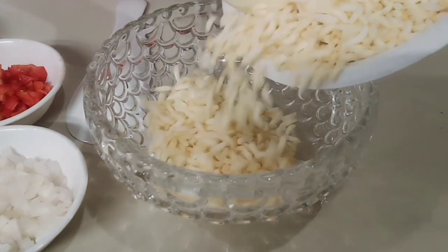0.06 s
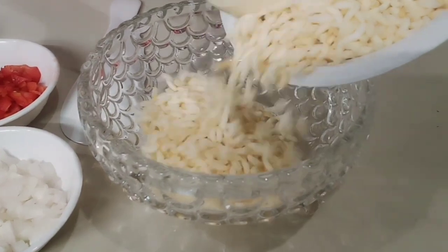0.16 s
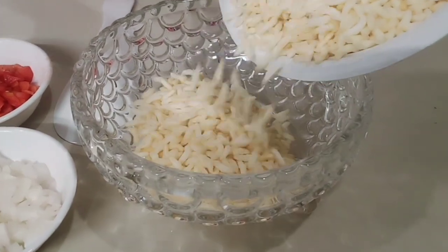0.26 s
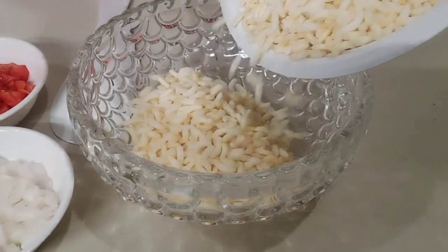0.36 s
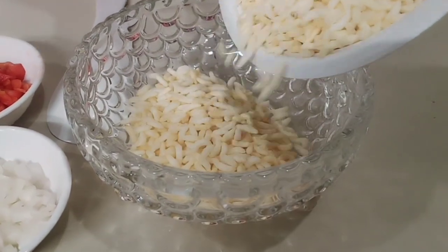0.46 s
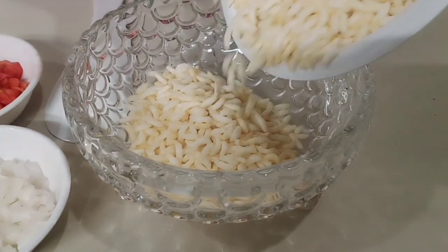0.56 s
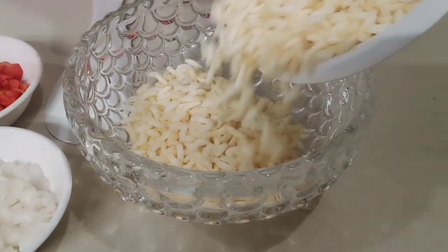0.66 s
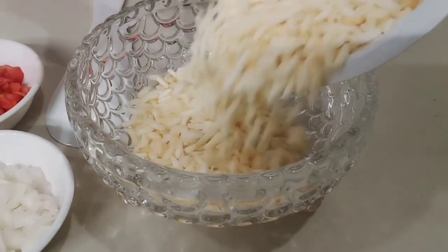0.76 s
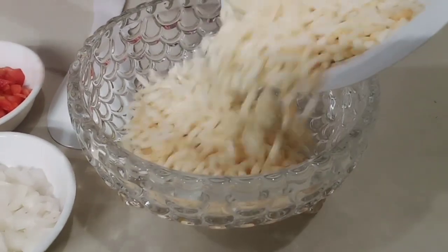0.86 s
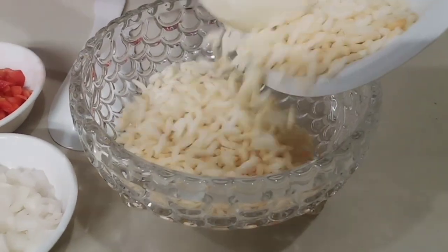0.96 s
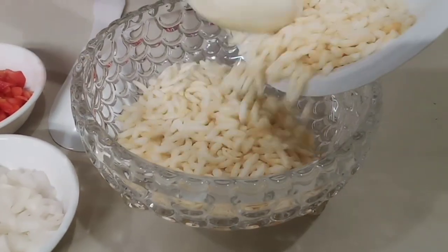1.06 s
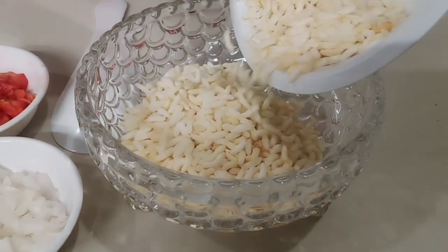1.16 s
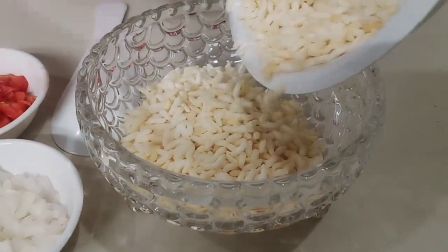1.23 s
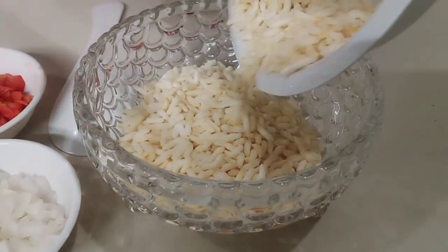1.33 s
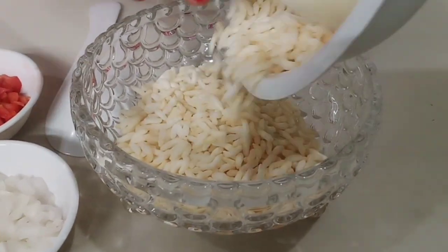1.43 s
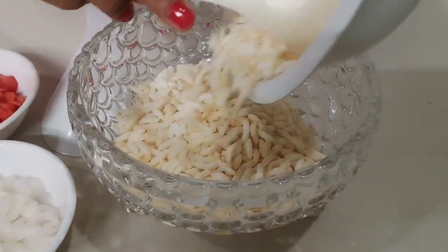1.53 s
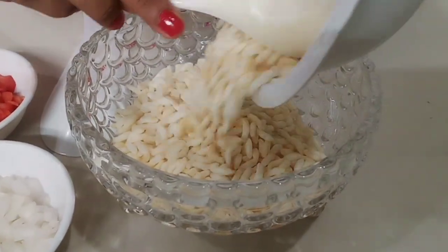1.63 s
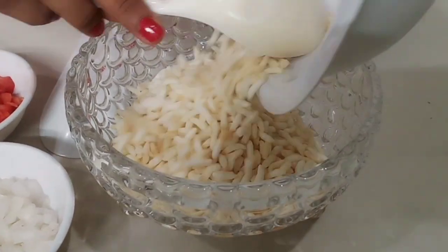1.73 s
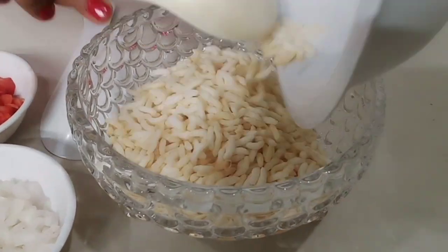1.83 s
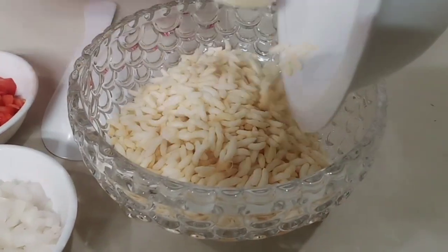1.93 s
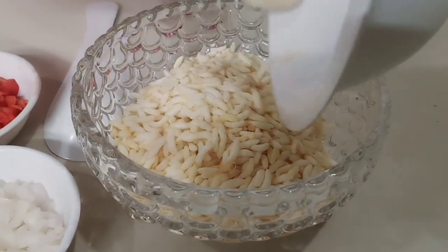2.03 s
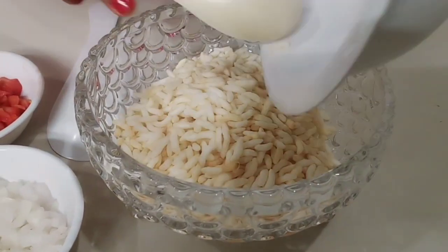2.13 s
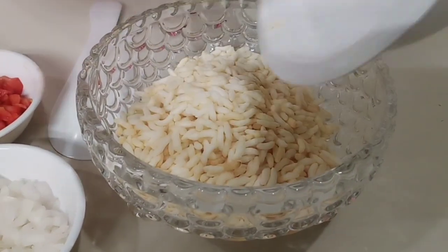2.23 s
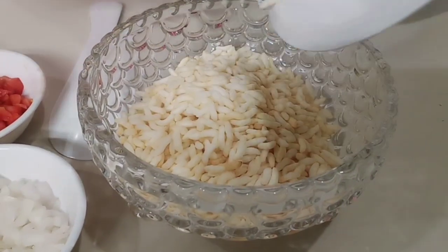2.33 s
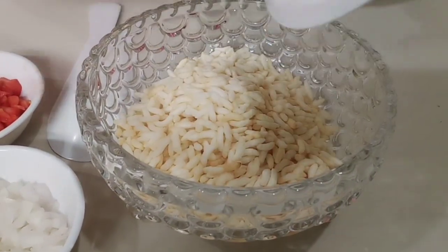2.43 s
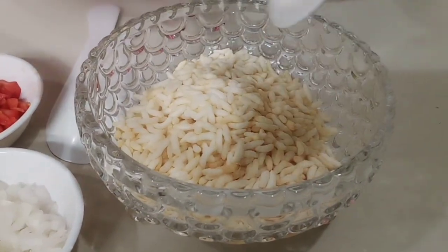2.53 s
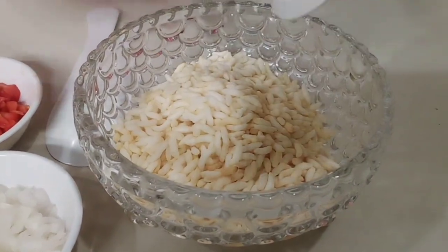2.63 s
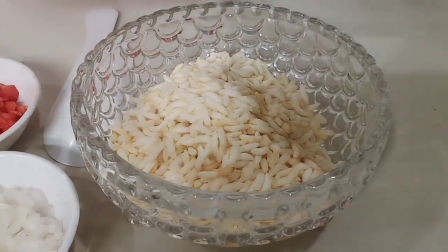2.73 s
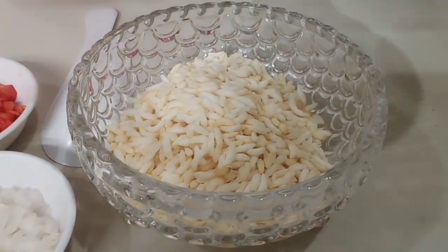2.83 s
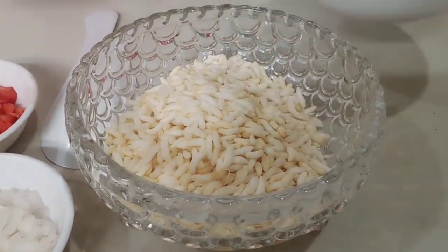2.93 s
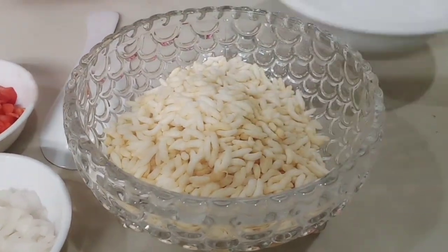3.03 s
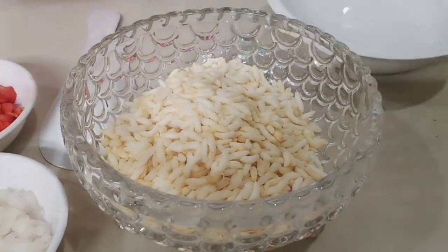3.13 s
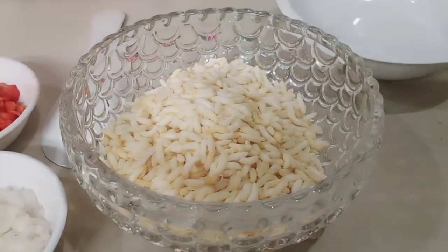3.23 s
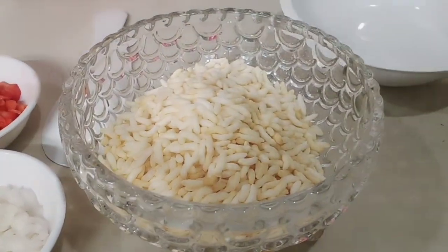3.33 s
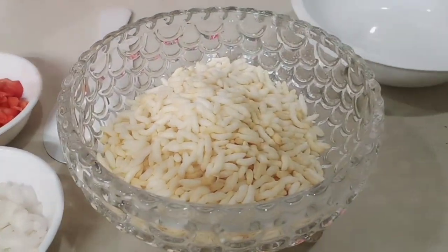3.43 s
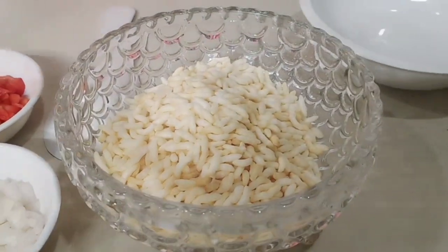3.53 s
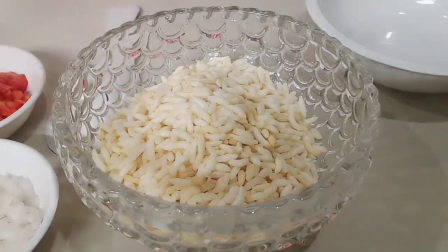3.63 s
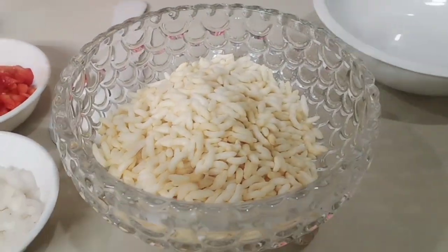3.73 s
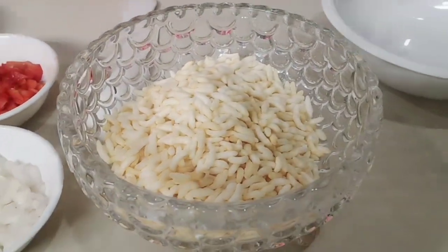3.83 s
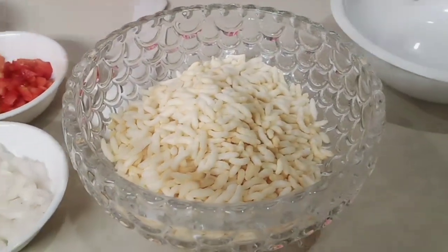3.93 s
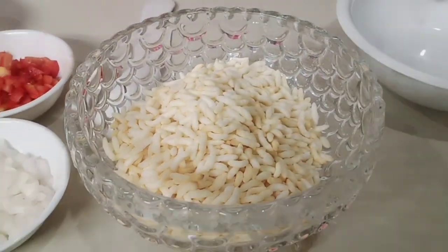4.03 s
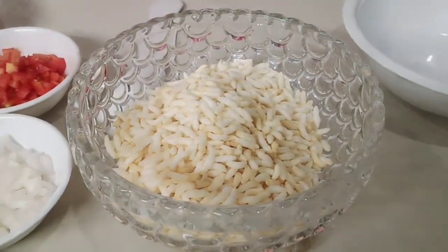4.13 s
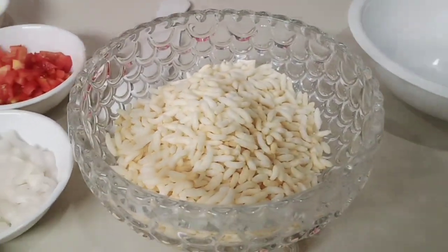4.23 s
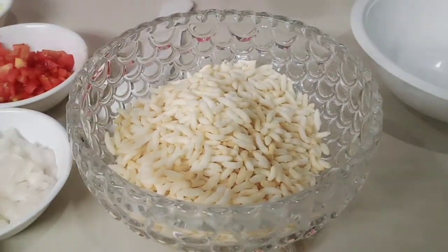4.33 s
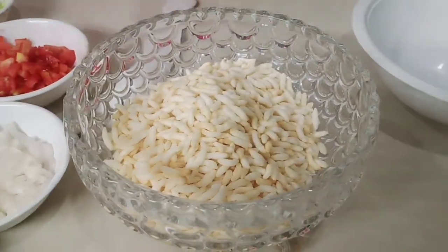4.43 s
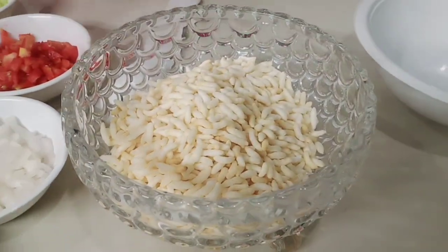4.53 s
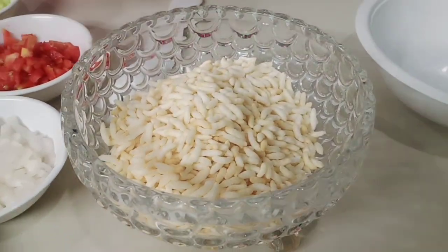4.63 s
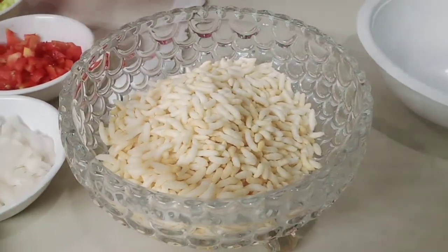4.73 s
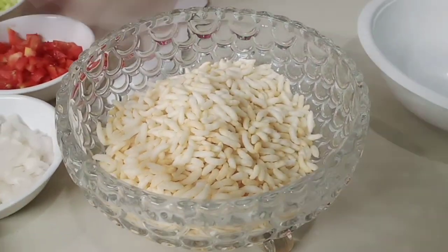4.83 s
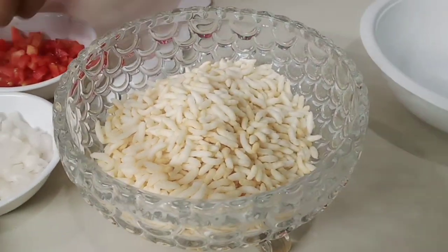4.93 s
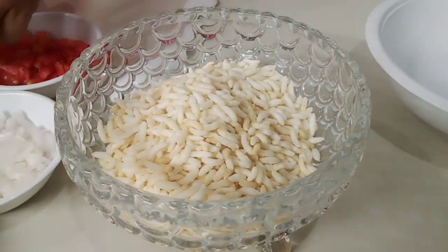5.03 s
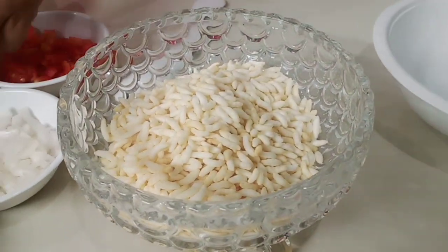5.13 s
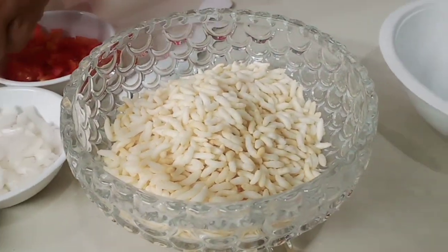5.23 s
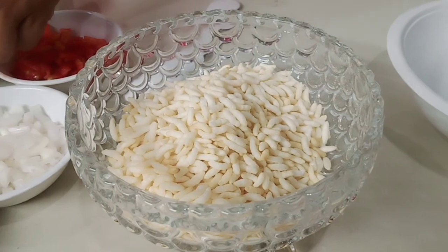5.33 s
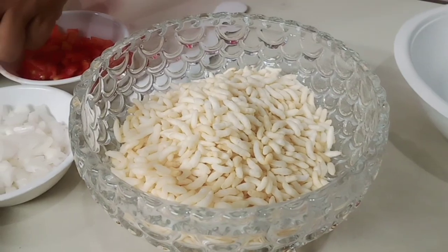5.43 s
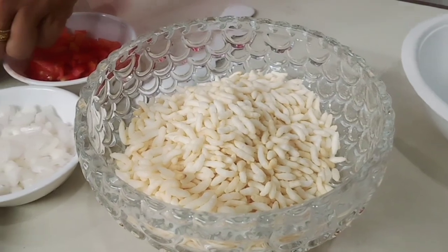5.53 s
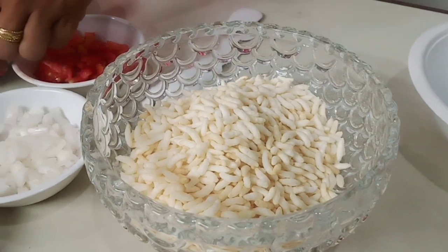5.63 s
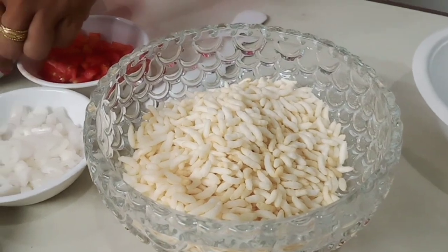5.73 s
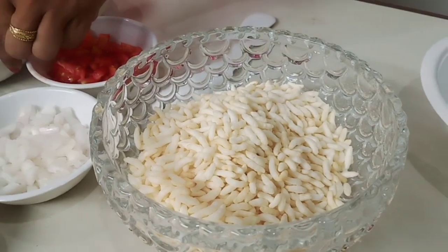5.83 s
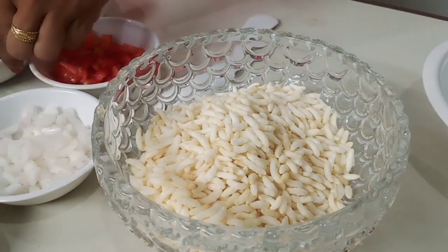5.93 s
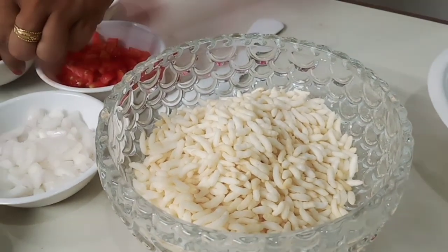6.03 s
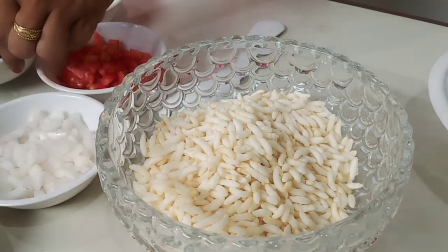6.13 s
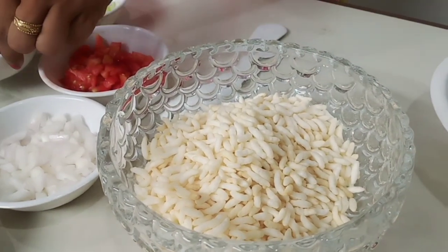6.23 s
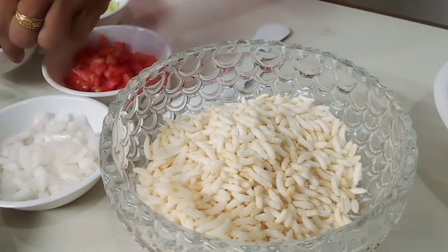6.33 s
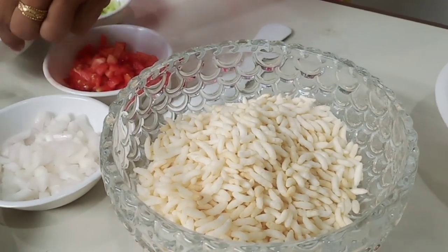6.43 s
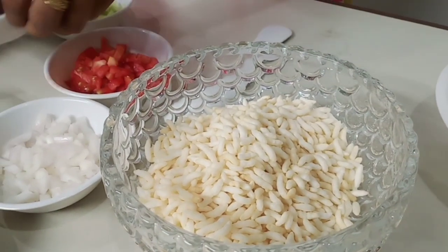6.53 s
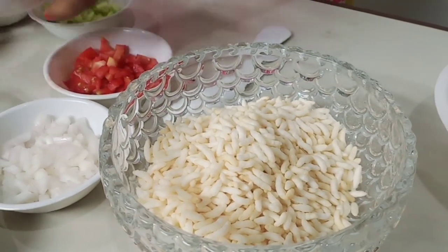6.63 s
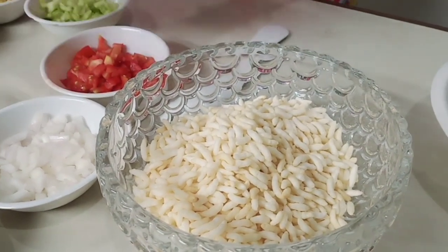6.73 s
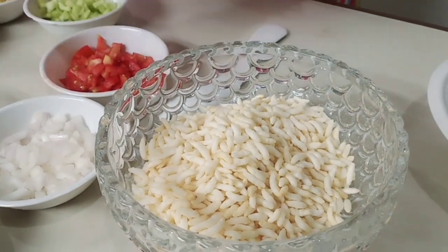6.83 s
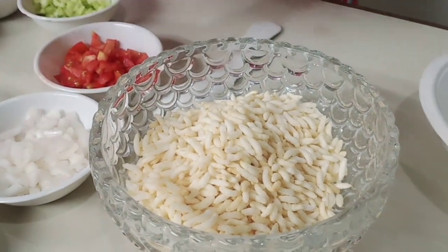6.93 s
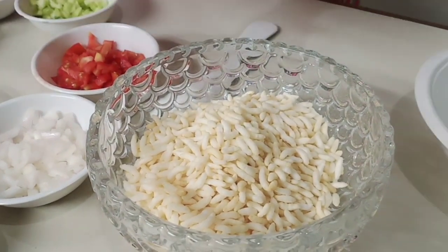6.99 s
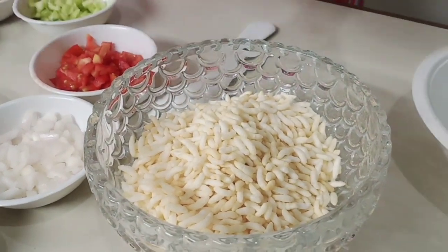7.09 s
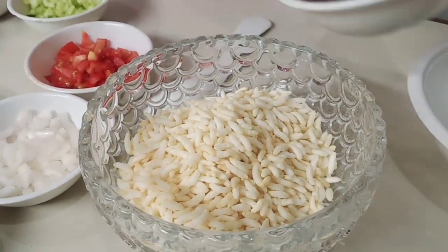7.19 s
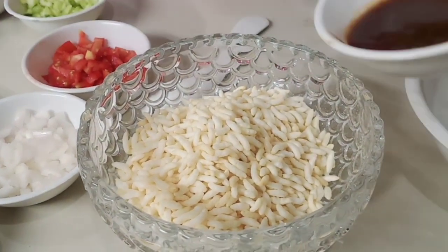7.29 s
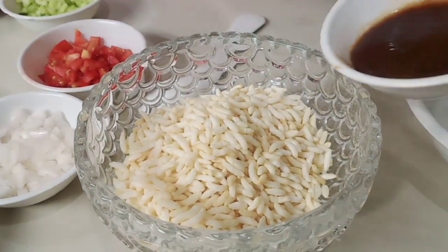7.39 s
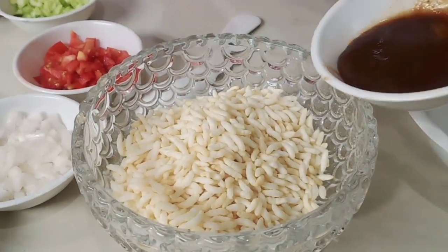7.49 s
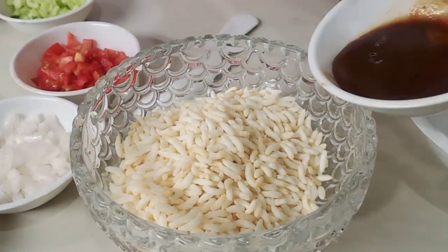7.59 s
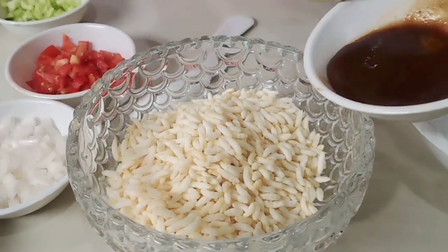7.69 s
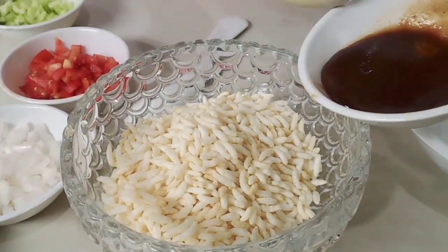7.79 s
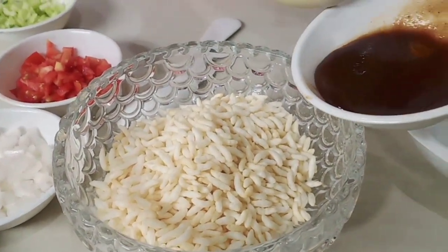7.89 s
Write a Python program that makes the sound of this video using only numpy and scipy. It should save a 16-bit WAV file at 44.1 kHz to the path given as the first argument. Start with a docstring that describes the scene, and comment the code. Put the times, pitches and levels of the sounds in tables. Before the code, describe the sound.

Close in a small hard kitchen, puffed rice pours in uneven bright rattling gushes into a glass bowl for two seconds, with light bowl knocks. The empty plastic bowl is set on a stone counter with a loud knock. After faint handling, small china dishes clink, scrape and knock sharply, then near silence and one dry tap. A low engine drones faintly outside early on.

```python
"""In a small hard kitchen, puffed rice pours from a plastic bowl into a glass bowl, and the empty bowl is
set down on a stone counter. A hand then shifts small china dishes, which clink, slide and knock.
The rice is clouds of clicks and pings; blows are noise bursts with decaying modes; friction is filtered
clicks. Scattered reflections make the room; an engine (tones and growl) drones outside, and a horn
(swelling partials) sounds far away."""
import sys
import numpy as np
from scipy import signal
from scipy.fft import rfft, irfft
from scipy.io import wavfile
from scipy.ndimage import uniform_filter1d

SR = 44100
rng = np.random.default_rng(int(sys.argv[2]) if len(sys.argv) > 2 else 0)


def put_to_file(sound):
    """Save the sound as 16-bit audio at rate SR, in the file named by the first command-line argument."""
    columns = np.atleast_2d(sound).T  # one column per channel
    safe = np.clip(columns, -1, 1)
    whole_steps = np.round(safe * 32767)
    wavfile.write(sys.argv[1], SR, whole_steps.astype(np.int16))


N = 350771

# blows on the bowls: start_s, force_db, counter_thud_db, tilt_db (per band), ringing_mode_hz
BOWL_BLOWS = [(0.14, -27, -29.5, -43, 1110), (0.387, -37, -55, -3.5, 1460), (0.463, -33.5, -71, -4, 744),
              (0.517, -40, -81, -5, 748), (1.372, -39.5, -47, -13, 990.5), (1.513, -35.5, -61.5, -31, 769),
              (2.4175, -24.5, -45, 2.4, 2252), (2.477, -36, -46.5, 0.5, 1442), (3.225, -12, -13, -7.5, 873),
              (3.253, -23, -18.5, -7, 3710), (3.6837, -31, -23, -8.5, 3470)]
# colour of the microphone ports: frequency_hz, level_db
MICROPHONE = [(4200, 6), (5400, -4), (6500, 2.5), (8300, 10.5), (10500, -2.5), (15000, 2)]
# thud, body, ring, crack and tick lie between these: edge_hz
BAND_EDGES_HZ = [135, 550, 1250, 2800, 5400, 12500]
TOP_HZ = 15900  # upper limit of the sound


def gain_of(db):
    """Decibels to gain."""
    return 10 ** (np.asarray(db) / 20)


def evened(x):
    """Scales to rms 1."""
    return x / np.sqrt(np.mean(x ** 2) + 1e-20)


def read(points, hz):
    """Reads a table along log frequency."""
    f, value = np.transpose(points)
    return np.interp(np.log(hz + 1), np.log(f + 1), value)


def unroll(rows):
    """Curve rows to one value a sample, with the first sample's index."""
    s, *columns = np.transpose(rows)
    t = np.arange(s[0], s[-1], 1 / SR)
    return round(s[0] * SR), [np.interp(t, s, c) for c in columns]


def add(mix, start, sound):
    """Mixes a sound in from a sample index."""
    part = mix[..., start:start + sound.shape[-1]]
    part += sound[..., :part.shape[-1]]


def sides(pan_db):
    """Left and right gains; a positive pan leans left."""
    return gain_of(np.array([pan_db / 2, -pan_db / 2]))


def colour(x, points):
    """Shapes the spectrum by a table of frequency and level."""
    hz = np.fft.rfftfreq(x.shape[-1], 1 / SR)
    return irfft(rfft(x) * gain_of(read(points, hz)), x.shape[-1])


def alike(pair):
    """Makes two unrelated channels agree in the bass, as close microphone ports do."""
    # left-right likeness of scattered sound: frequency_hz, likeness (0-1)
    likeness = [(150, 0.95), (400, 0.9), (950, 0.4), (2400, 0.03)]
    a, b = rfft(pair)
    same = np.clip(read(likeness, np.fft.rfftfreq(pair.shape[-1], 1 / SR)), 0, 1)
    return irfft([a, same * a + np.sqrt(1 - same ** 2) * b], pair.shape[-1])


def band(x, lo_hz, hi_hz, order=3):
    """Causal band-pass."""
    return signal.sosfilt(signal.butter(order, [lo_hz, min(hi_hz, SR / 2.1)], "band", fs=SR, output="sos"), x)


def crackle(count, per_s, spread_db):
    """Two channels of random clicks; a wider spread makes a few of them large."""
    size = gain_of(spread_db * np.minimum(rng.exponential(1, (2, count)), 5))
    return size * rng.standard_normal((2, count)) * (rng.random((2, count)) < per_s / SR)


def stroke(start, length, db, lean, point):
    """One swell of a hand or dish: first sample and gain.

    A lean below 1 peaks early; a high point is a narrow peak."""
    u = np.arange(0, length, 1 / SR) / length
    return round(start * SR), gain_of(db) * abs(np.sin(np.pi * u ** lean)) ** point


def pings(count):
    """Hollow grains of many sizes, each ringing briefly at its own pitch."""
    per_s, t60 = 120, 0.012  # rate for each of the 24 sizes, decay in s
    t = np.arange(SR // 50) / SR
    out = np.zeros((2, count))
    for hz in np.geomspace(3000, 15500, 24):
        shape = gain_of(-60 * t / t60) * np.sin(2 * np.pi * hz * t)
        out += signal.oaconvolve(crackle(count, per_s, 2), shape[None])[:, :count]
    return evened(out)


def pour():
    """Thousands of light grains tick on each other and drum on the heap."""
    # flow of the rice stream, heard as its rattle: time_s, level_db
    flow = [(0, -36.5), (.1, -38.5), (.2, -44), (.37, -46.5), (.508, -40.5), (.522, -36), (.72, -33.5),
            (.85, -37), (1.15, -49), (1.3, -47.5), (1.35, -40.5), (1.45, -42), (1.52, -37.5), (1.75, -40),
            (1.88, -49.5), (1.97, -58), (2.03, -89)]
    # colour of the rattle: frequency_hz, level_db
    grain_colour = [(2200, -23), (2900, -7.5), (3900, 4.5), (5400, -7), (6500, 3.5), (8000, 7), (9500, 3),
                    (12500, 3), (15000, 5.5)]
    # colour of the drumming: frequency_hz, level_db
    heap_colour = [(500, -44), (640, -13), (780, 5.5), (950, -5), (1150, -10), (1500, 0), (2500, 10.5),
                   (3300, 6)]
    full_db, drum_db, drum_growth = -37, -44, 1.52  # drumming grows faster than the rattle
    shake_db, shake_t60 = -22, 0.51  # level relative to the knock, decay in s
    ping_db = -6  # relative to the clicks
    out = np.zeros((2, N))
    start, (rattle_db,) = unroll(flow)
    count = len(rattle_db)
    t = np.arange(count) / SR

    heap = gain_of(drum_db + drum_growth * (rattle_db - full_db))
    for s, force_db, *_ in BOWL_BLOWS:  # a knock during the pour shakes the rice
        heap += (t > s) * gain_of(force_db + shake_db - 60 * abs(t - s) / shake_t60)

    grains = alike(crackle(count, per_s=6000, spread_db=0.2))
    clumps = evened(uniform_filter1d(rng.standard_normal(count), size=SR // 50))
    grains *= gain_of(1.4 * clumps)
    ringing = gain_of(ping_db) * grains.std() * pings(count)
    rattle = gain_of(rattle_db) * evened(colour(grains + ringing, grain_colour))
    drumming = heap * evened(colour(grains[:, ::-1], heap_colour))  # the same clicks, backwards
    add(out, start, (rattle + drumming) * sides(-0.86)[:, None])
    return out


def ring(lo_hz, hi_hz, t60, modes=(), spot_hz=0, far_db=0):
    """A short burst plus the decaying modes inside a band, scaled to peak 1.

    The mode nearest spot_hz rings out at that pitch; the rest chatter far_db lower."""
    t = np.arange(SR // 2) / SR
    out = evened(band(colour(rng.standard_normal(len(t)), MICROPHONE), lo_hz, hi_hz, order=1))
    contact = 1.8 * gain_of(-60 * t / 0.022)
    out *= (gain_of(-60 * t / t60) + contact) * np.minimum(t / 0.0031, 1)
    struck_hz = min((abs(hz - spot_hz), hz) for hz, *_ in modes)[1] if spot_hz else 0
    for hz, db, mode_t60 in modes:
        shape = 1
        if hz == struck_hz:
            hz = spot_hz
        elif spot_hz:
            chatter = evened(uniform_filter1d(rng.standard_normal(len(t)), size=SR // 70))
            shape = chatter * gain_of(-far_db)
        if lo_hz < hz < hi_hz:
            out += shape * gain_of(db - 60 * t / mode_t60) * np.sin(2 * np.pi * hz * t)
    out = band(out, lo_hz, hi_hz, order=2)
    return out / abs(out).max()


def blows(rows, modes, colour_db, far_db, pan_db, left_lag_s):
    """Each blow thuds the counter and rings the struck vessel in four bands, each with its own decay."""
    # modes of the stone counter: frequency_hz, level_db, t60_s
    counter_modes = [(160, -7, 0.36), (197, -9, 0.35), (223, -12, 0.2), (330, -4.5, 0.18), (374.7, 4, 0.13),
                     (502.7, 1.5, 0.084)]
    out, (left, right) = np.zeros((2, N)), sides(pan_db)
    bands = list(zip(BAND_EDGES_HZ[1:], BAND_EDGES_HZ[2:], [0.07, 0.07, 0.057, 0.19]))  # low, high, t60
    for s, force_db, thud_db, tilt_db, spot_hz in rows:
        thud = gain_of(thud_db) * ring(*BAND_EDGES_HZ[:2], 0.19, counter_modes)
        levels_db = force_db + tilt_db * np.arange(len(colour_db)) + colour_db
        vessel = 0
        for db, (lo_hz, hi_hz, t60) in zip(levels_db, bands):
            vessel = vessel + gain_of(db) * ring(lo_hz, hi_hz, t60, modes, spot_hz, far_db)
        add(out[0], round((s + left_lag_s) * SR), thud + left * vessel)
        add(out[1], round(s * SR), thud + right * vessel)
    return out


def bowl_blows():
    """Knocks of the bowls: one mode rings out and the others chatter, turned down by 7 dB."""
    # modes of the bowls: frequency_hz, level_db, t60_s
    bowl_modes = [(755, 1, .24), (875, 1, .08), (1109, 2, .28), (1430, 5, .08), (2245, 2, .06),
                  (2480, 3, .1), (3400, -2, .1), (3690, 0, .14), (4400, -6, .1)]
    # body, ring, crack and tick of a level blow: level_db
    bowl_colour_db = [-0.5, 3.5, 3.5, 2.6]
    return blows(BOWL_BLOWS, bowl_modes, bowl_colour_db, far_db=7, pan_db=1.5, left_lag_s=0.00005)


def dish_blows():
    """Clinks and knocks of china: one mode rings out and the others chatter, turned down by 16 dB."""
    # blows on the dishes: start_s, force_db, counter_thud_db, tilt_db (per band), ringing_mode_hz
    dish_hits = [(5.027, -34.5, -58, -2.5, 2233), (5.031, -38.5, -48, -5, 2850),
                 (5.06, -41, -48, -12, 2340), (5.283, -33.5, -34.5, -10, 2500),
                 (5.367, -37.5, -65, -11, 2540), (5.389, -40, -42.5, -5.5, 2310),
                 (5.528, -16.5, -28.5, -12, 652), (5.545, -21, -30, -24, 2214), (5.99, -34, -38, 0.6, 2520),
                 (6.003, -21, -18.5, -2.5, 803), (6.01, -16, -14.5, -2, 2191),
                 (6.031, -18, -27, -0.5, 2540)]
    # modes of the dishes: frequency_hz, level_db, t60_s
    dish_modes = [(640, 1, .04), (810, 3, .06), (2196, 4, .44), (2290, 11, .06), (2490, 4, .05),
                  (2900, 12, .04), (7950, 8, .05)]
    # body, ring, crack and tick of a level blow: level_db
    dish_colour_db = [0.5, 5, -2.5, 4]
    return blows(dish_hits, dish_modes, dish_colour_db, far_db=16, pan_db=1.5, left_lag_s=0)


def ticks():
    """Small bright ticks (fingers, rings, the sharp top of two bowl knocks): bursts around one frequency."""
    # ticks: start_s, level_db, centre_hz
    tick_rows = [(0.378, -29, 14950), (2.3211, -36.5, 13300), (3.224, -32.5, 6200), (3.685, -60, 5240),
                 (4.381, -39, 15200), (4.5362, -43, 9700), (4.828, -47, 15200), (4.85, -56, 14800),
                 (5.139, -48.5, 7900), (6.342, -56.5, 3360), (6.903, -52.5, 7900)]
    out = np.zeros((2, N))
    for s, db, hz in tick_rows:
        add(out, round(s * SR), gain_of(db) * np.outer(sides(3.2), ring(0.62 * hz, 1.6 * hz, 0.039)))
    return out


def slides():
    """Uneven slips of a scraping foot excite a resonance, its octave and the hollow body."""
    # scrapes of bowls and dishes: start_s, length_s, level_db, lean, resonance_hz,
    # half_width (share of the frequency), octave_db
    scrapes = [(0.377, 0.16, -51, 0.48, 787, 0.13, -1), (3.582, 0.21, -56, 1.1, 487.4, 0.11, -15),
               (4.999, 0.052, -44.5, 3.24, 2340, 0.28, -9), (5.069, 0.13, -52.5, 2, 2270, 0.011, -37),
               (5.188, 0.08, -49, 0.45, 2275, 0.017, -40.5), (5.506, 0.02, -51.5, 0.4, 2330, 0.077, -19),
               (5.871, 0.16, -67.5, 0.47, 2320, 0.029, -20), (5.949, 0.06, -46, 1.8, 2616, 0.14, -8),
               (6.817, 0.19, -67.5, 0.4, 1600, 0.05, -4), (6.83, 0.15, -71, 0.6, 1890, 0.03, -3.5)]
    out = np.zeros((2, N))
    for s, length, db, lean, hz, width, octave_db in scrapes:
        start, swell = stroke(s, length, db, lean, point=1)
        slips = crackle(count=len(swell), per_s=5100, spread_db=-0.5)[0]
        parts = [(hz, width, 0), (2.03 * hz, width, octave_db), (hz / 3.46, 0.3, -5)]
        for f, w, part_db in parts:
            add(out, start, swell * gain_of(part_db) * evened(band(slips, f * (1 - w), f * (1 + w))))
    return out


def rustles():
    """Fine, uneven friction of hands and sleeves, coloured by the microphone ports."""
    # brushing: start_s, length_s, level_db
    brushes = [(2.59, 0.25, -63), (2.687, 0.34, -60), (3.449, 0.13, -63.5), (3.601, 0.53, -71),
               (4.19, 0.28, -75), (4.354, 0.49, -69), (4.53, 0.48, -64), (4.865, 0.15, -51),
               (5.035, 1, -68.5), (5.86, 0.24, -60), (6.33, 0.097, -57), (6.447, 0.12, -64),
               (6.74, 0.21, -64), (6.852, 0.26, -67)]
    out = np.zeros((2, N))
    for row in brushes:
        start, swell = stroke(*row, lean=0.26, point=3)
        grit = crackle(count=len(swell), per_s=9800, spread_db=3.5)
        add(out, start, swell * evened(colour(band(grit, BAND_EDGES_HZ[-2], TOP_HZ), MICROPHONE)))
    return out


def tap():
    """A cup lifted close by taps once: a very short, dry contact."""
    # the tap: start_s, knock_db, tick_db (relative to the knock)
    s, db, tick_db = (7.412, -27, -7.5)
    # mode of the cup: frequency_hz, level_db, t60_s
    cup_modes = [(1614, -22, 0.07)]
    out = np.zeros((2, N))
    knock = ring(853, 2170, 0.0083, cup_modes)
    tick = gain_of(tick_db) * ring(2000, 6300, 0.013)
    add(out, round(s * SR), gain_of(db) * (knock + tick))
    return out


def bumps():
    """Soft low bumps felt through the microphone's stand: brief rounded tones."""
    # bumps: start_s, level_db, pitch_hz
    bump_rows = [(0.449, -42.5, 68), (.5, -41.5, 68), (3.552, -51, 158), (6.81, -64.5, 315)]
    out, t = np.zeros(N), np.arange(round(0.07 * SR)) / SR
    for s, db, hz in bump_rows:
        add(out, round(s * SR), gain_of(db) * np.hanning(len(t)) * np.sin(2 * np.pi * hz * t))
    return out


def kitchen(x):
    """Dense reflections, each band dying at its own speed."""
    # decay of the room: frequency_hz, t60_s
    room_decay = [(150, .42), (840, 0.36), (2200, 0.34), (9000, 0.27)]
    taps = np.zeros((2, SR // 2))
    # one reflection at a random place in every 20 samples
    at = np.arange(200, SR // 2 - 20, 20) + rng.integers(0, 20, (2, (SR // 2 - 201) // 20))
    np.put_along_axis(taps, at, rng.choice([-1., 1.], at.shape), 1)
    hz, t, z = signal.stft(alike(taps), SR, nperseg=256)
    decay = gain_of(-60 * t / read(room_decay, hz)[:, None])
    tail = signal.istft(z * decay, SR, nperseg=256)[1]
    return signal.fftconvolve(x.mean(0)[None], tail / np.linalg.norm(tail[0]), axes=1)[:, :N]


def engine():
    """Multiples of the firing rate over a noise growl; two pulls rise over an idle that fades out."""
    # pulls over the idle: start_s, end_s, level_db
    pulls = [(0.02, 1.576, -57), (1.82, 2.224, -60.5)]
    # tones: multiple of the firing rate, level_db
    orders = [(3, -10), (5, 0), (6, -1)]
    firing_hz, idle_db, idle_end_s, throttle_s = 28.32, -68.5, 3.1, 0.11
    t = np.arange(N) / SR
    load = gain_of(idle_db) * np.clip(idle_end_s - t, 0, 1)  # fades over its last second
    for begin, end, db in pulls:
        load += gain_of(db) * np.clip(np.minimum(t - begin, end - t) / throttle_s, 0, 1)
    tones = np.zeros(N)
    for k, db in orders:
        tones += gain_of(db) * np.sin(2 * np.pi * (k * firing_hz * t + rng.random()))
    growl = 0.51 * evened(band(rng.standard_normal(N), 66, 200))
    return load * (tones + growl)


def horn():
    """Upper partials of a far two-tone horn; pitch rises and falls with the swell."""
    # partials: start_s, end_s, base_pitch_hz, level_db
    partials = [(7.6, 7.95, 3160, -72), (7.64, 7.98, 3370, -72), (7.72, 7.93, 3480, -70)]
    t, out = np.arange(N) / SR, np.zeros(N)
    for begin, end, hz, db in partials:
        swell = np.sin(np.pi * np.clip((t - begin) / (end - begin), 0, 1))
        cycles = hz * np.cumsum(1 + 0.012 * swell) / SR
        out += gain_of(db) * swell * np.sin(2 * np.pi * cycles)
    return out


def air():
    """Quiet room tone: coloured noise that swells slowly."""
    # colour of the room tone: frequency_hz, level_db
    air_colour = [(25, -38.5), (90, -7.5), (150, -2), (350, -17), (800, -22.5), (2000, -23.5),
                  (6000, -26.5), (15900, -22)]
    air_db = -69
    noise = alike(colour(colour(rng.standard_normal((2, N)), air_colour), MICROPHONE))
    drift = uniform_filter1d(rng.standard_normal(N), size=SR // 8)
    swell = evened(uniform_filter1d(drift, size=SR // 8))
    return gain_of(air_db + 1.5 * swell) * evened(noise)


def scene():
    """Near sounds with their room, then the far ones."""
    hits = bowl_blows() + dish_blows() + ticks()
    near = pour() + slides() + rustles()
    cup = tap()
    room = kitchen(gain_of(-1.5) * hits + gain_of(-5.5) * near + gain_of(-8.5) * cup)
    return hits + near + cup + room + bumps() + engine() + horn() + air()


def record(dry):
    """The two ports differ in colour; then the band limit."""
    # left port over right: frequency_hz, difference_db (half goes to each side)
    port_difference = [(200, 0.5), (700, 1.5), (1500, 3), (3000, 4.5), (6000, 4), (9000, -2.5),
                       (13000, 4.5)]
    left = colour(dry[0], np.multiply(port_difference, [1, 0.5]))
    right = colour(dry[1], np.multiply(port_difference, [1, -0.5]))
    low_pass = signal.firwin(511, TOP_HZ, window=("kaiser", 9), fs=SR)
    return signal.oaconvolve([left, right], low_pass[None], "same")


dry = scene()
out = record(dry)
put_to_file(out)
```